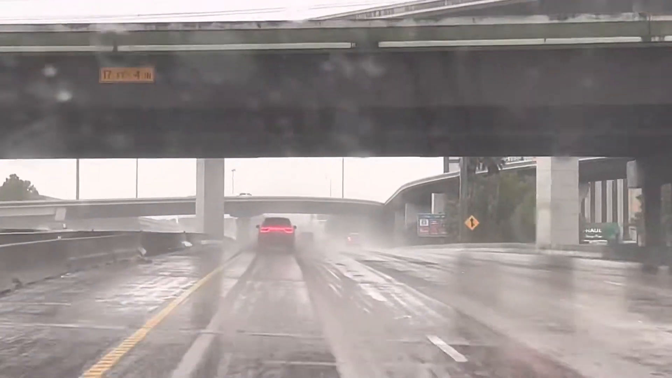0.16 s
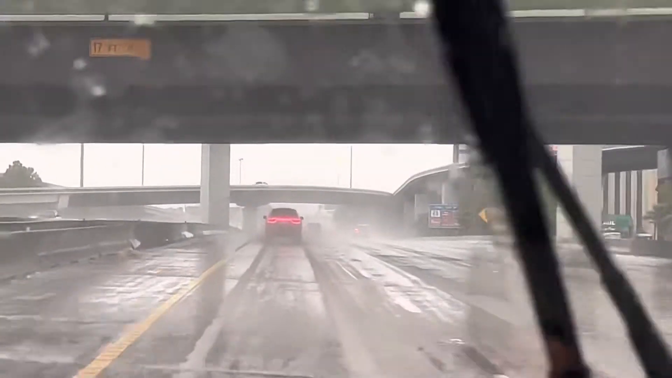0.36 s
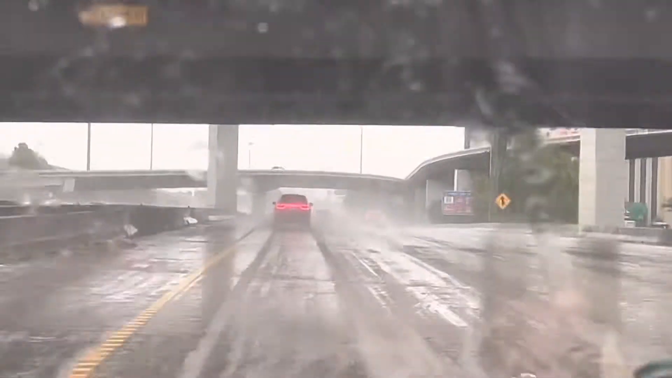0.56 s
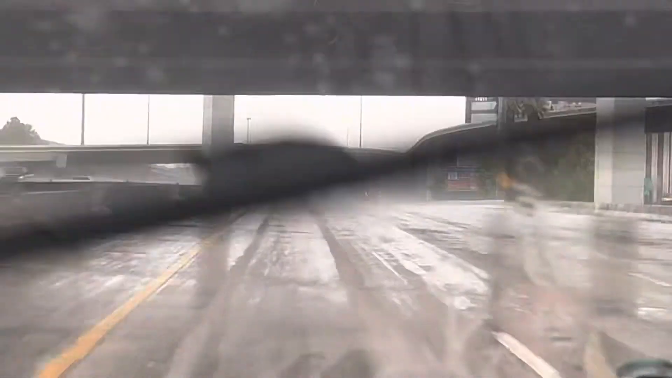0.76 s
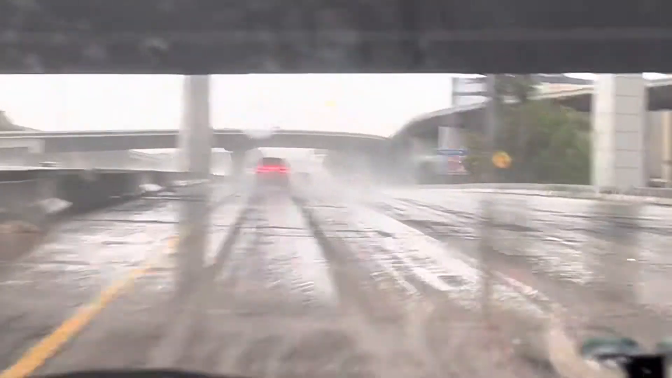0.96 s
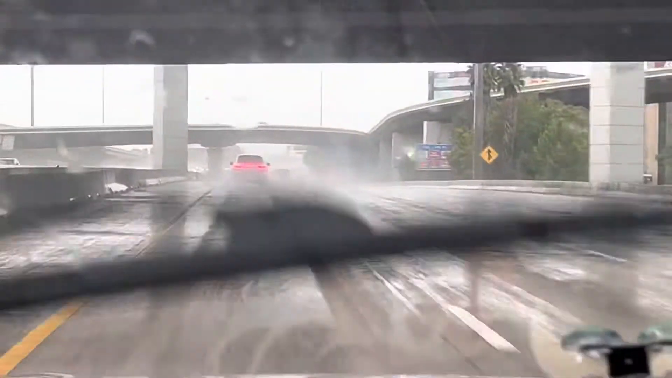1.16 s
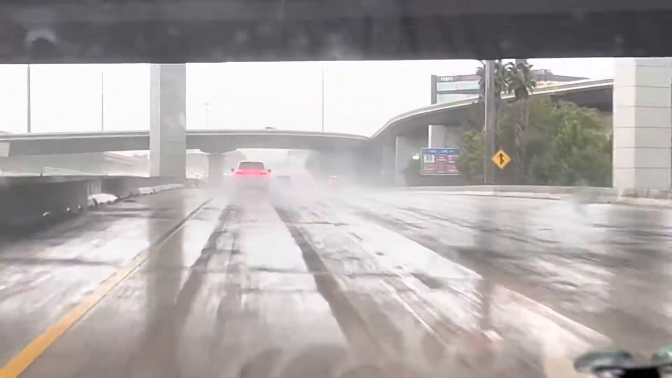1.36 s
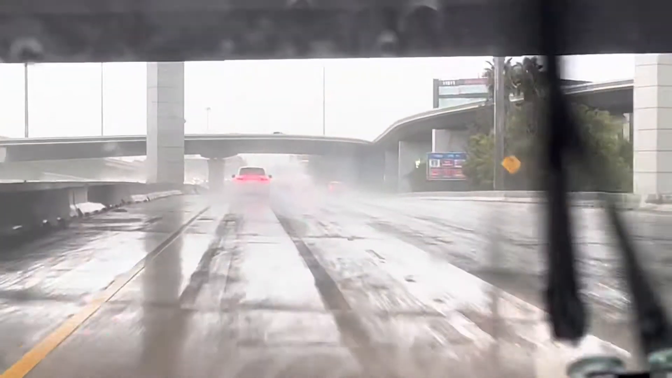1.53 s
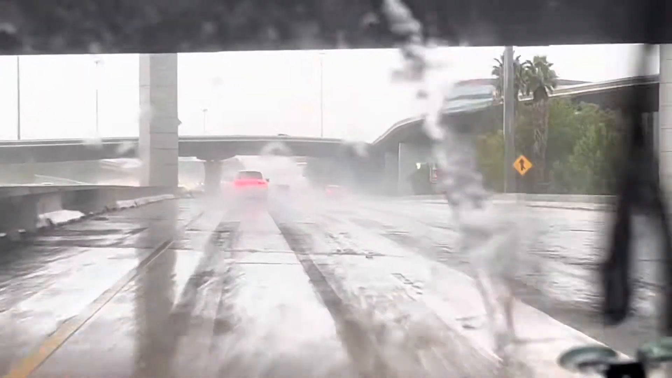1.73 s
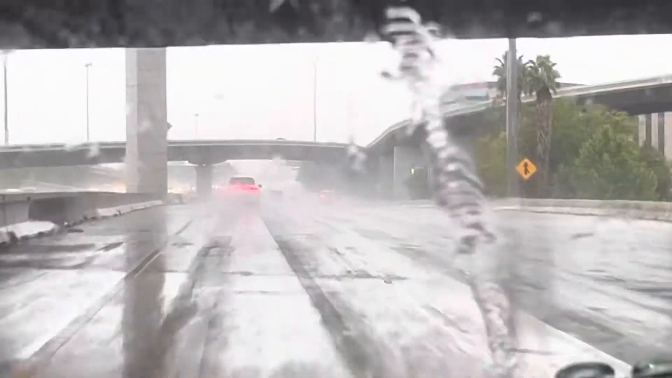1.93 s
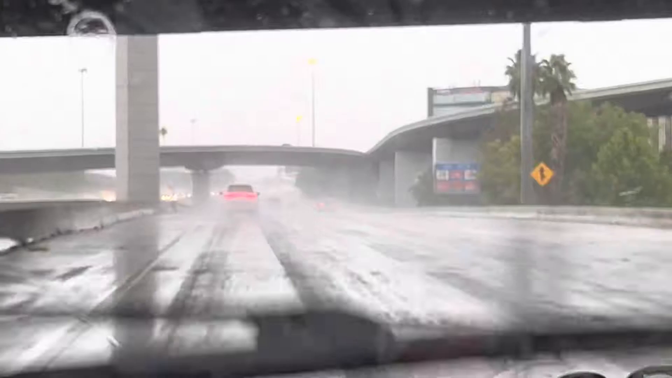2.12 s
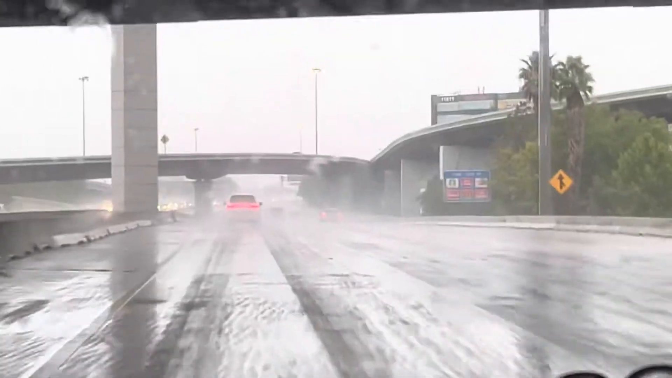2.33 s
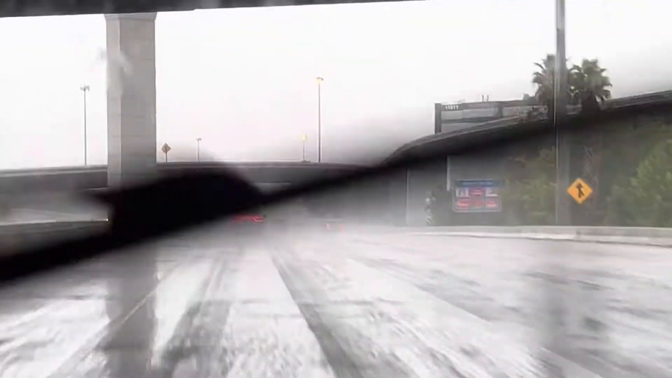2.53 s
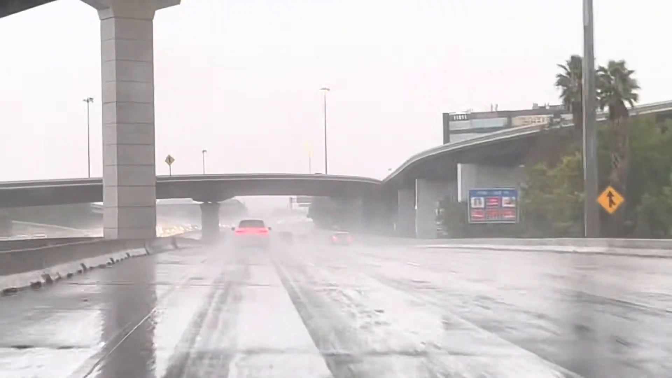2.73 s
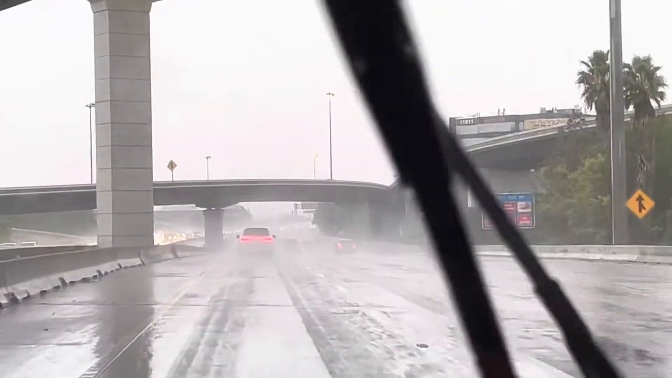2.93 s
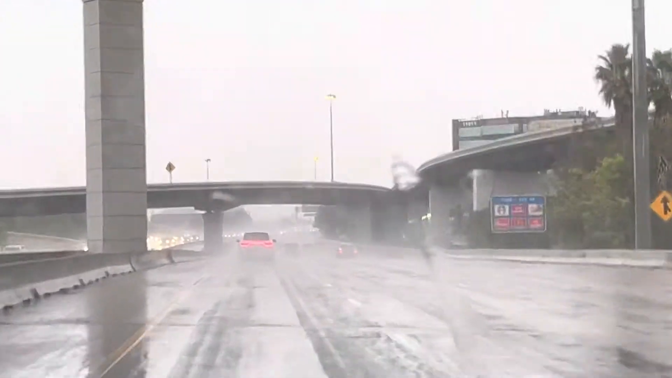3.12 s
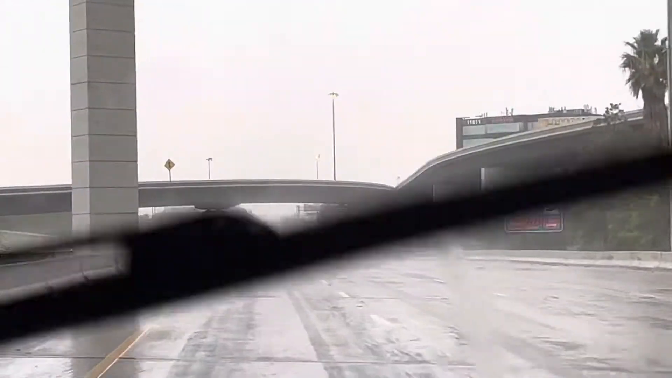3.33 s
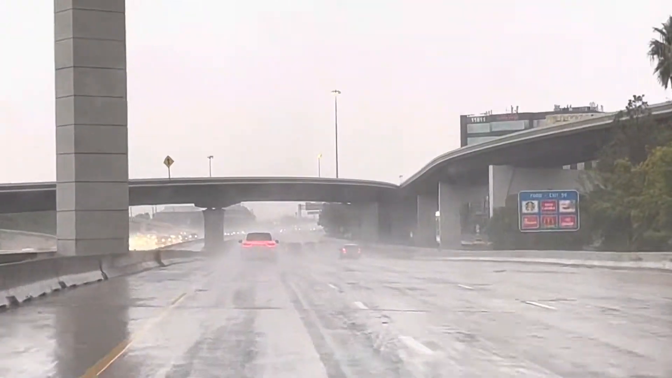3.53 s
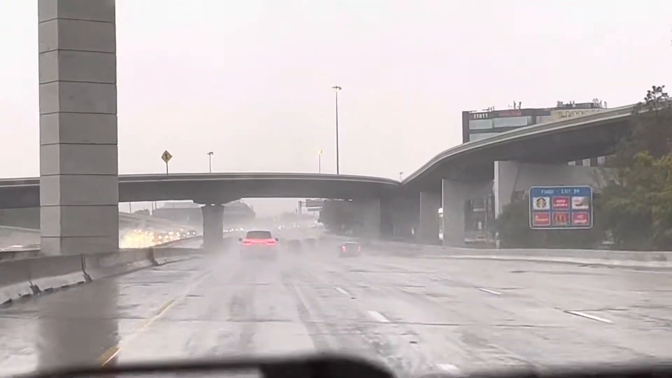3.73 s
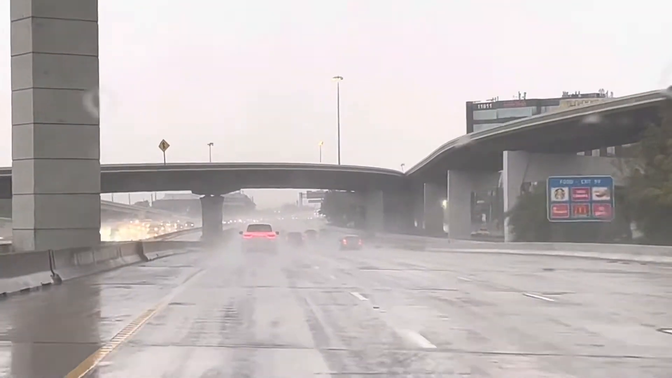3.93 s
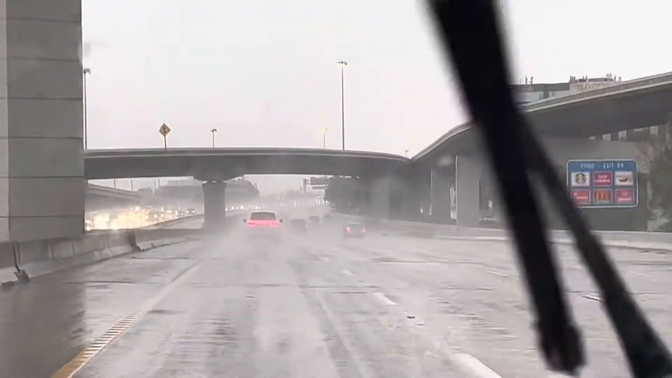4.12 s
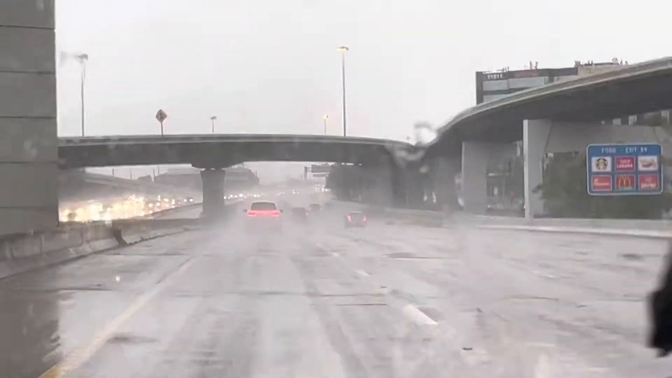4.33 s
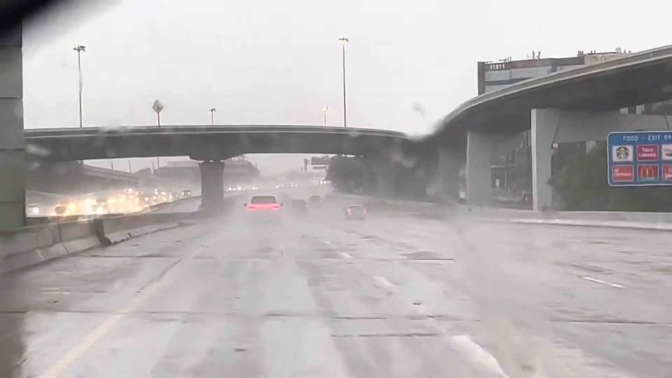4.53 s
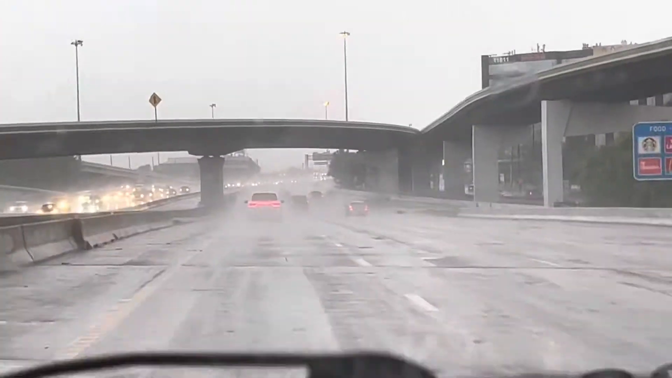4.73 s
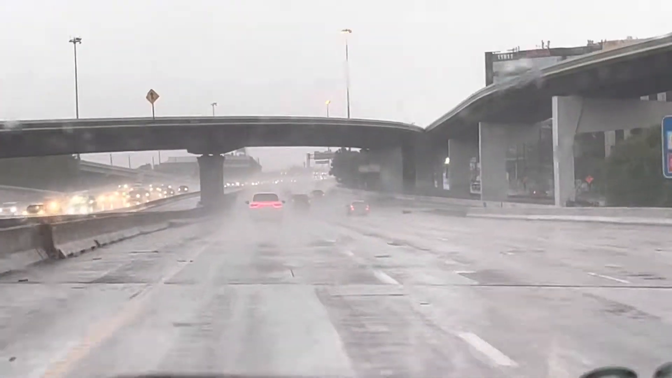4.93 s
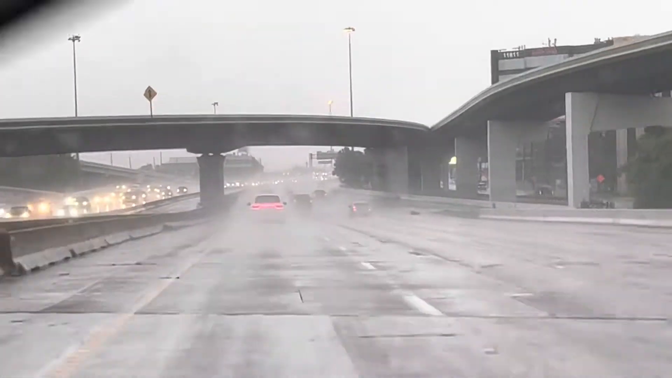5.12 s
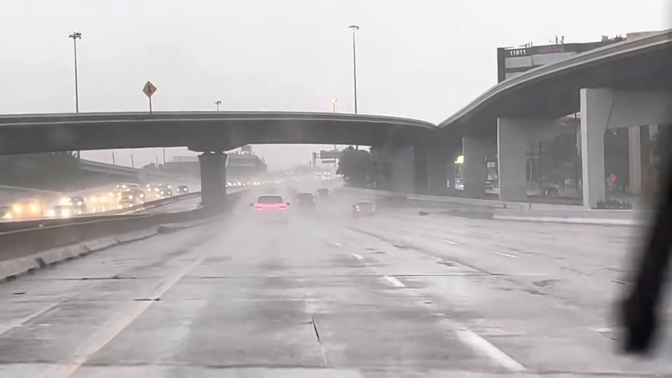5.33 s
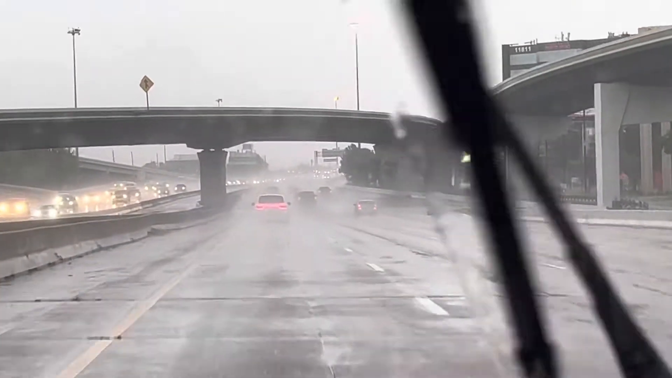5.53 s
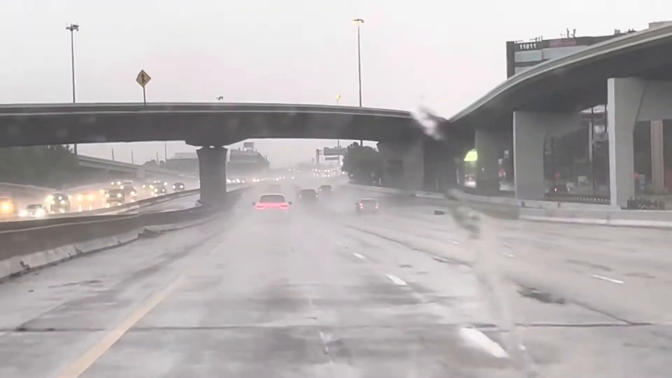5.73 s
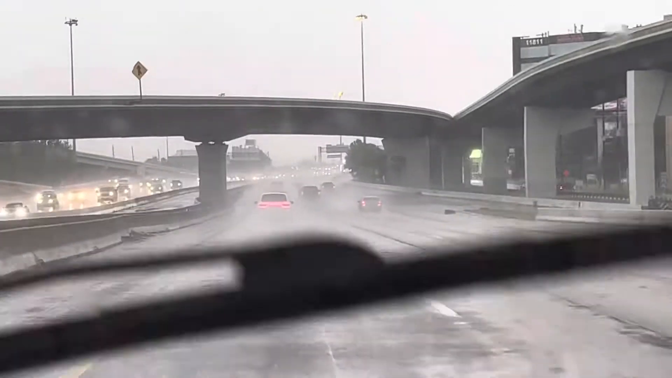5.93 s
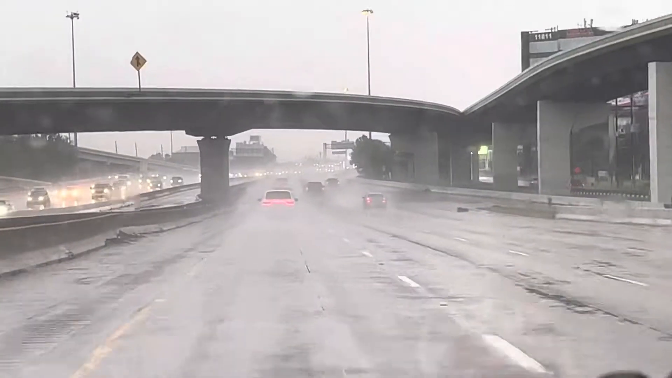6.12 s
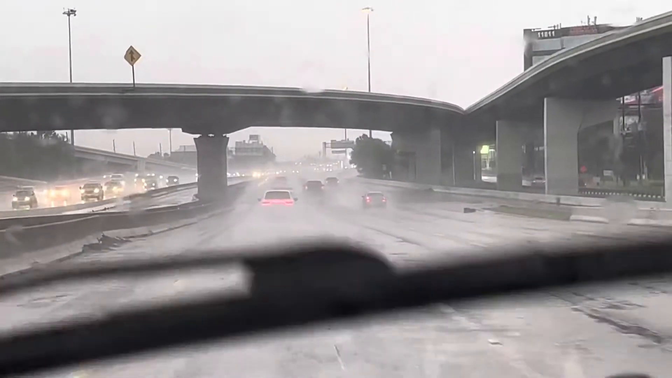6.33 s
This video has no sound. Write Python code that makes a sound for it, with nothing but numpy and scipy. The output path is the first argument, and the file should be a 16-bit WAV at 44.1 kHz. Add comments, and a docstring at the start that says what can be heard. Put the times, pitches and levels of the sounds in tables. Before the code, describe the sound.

A phone-like stereo pickup in a moving car catches crisp, uneven rain spatter on glass above a heavy, boxy road rumble. The rain drops away just after two seconds, flashes back at three, drops again, returns strongly, and drops once more near five. A low unsteady hum from grooved pavement and double thumps of slab joints continue beneath, with soft tyre spray and a small wiper tick in two of the lulls.

```python
"""Tyres roar on a wet concrete freeway, heard inside a car in heavy rain: filtered noise shakes the cabin's resonances.
Slab joints thump as short damped rings; a grooved stretch hums and whines; water hisses in the wheel arches.
Drops patter on the windshield as bursts of noise that ring the glass, and nearly vanish under three overpasses.
The wiper blade ticks twice. A phone with two microphone ports hears it all from behind the glass."""
import sys
import numpy as np
from scipy import signal
from scipy.fft import rfft, irfft
from scipy.io import wavfile
from scipy.ndimage import uniform_filter1d

SR = 44100
rng = np.random.default_rng(int(sys.argv[2]) if len(sys.argv) > 2 else 0)


def dump(signal):
    """Clip the signal to [-1, 1] and save it as 16-bit WAV at the path in sys.argv[1]."""
    limited = np.clip(np.atleast_2d(signal).T, -1, 1)
    pcm = np.round(limited * 32767).astype(np.int16)
    wavfile.write(sys.argv[1], SR, pcm)


N = 284886  # length in samples

# tyre roar over the road surface [t/s, level/dB before each sound's own offset]
ROAD_SURFACE = [(0, -29), (.7, -30.5), (1.3, -29), (1.9, -30), (2.8, -28.5), (5.6, -29), (5.96, -29),
                (6.46, -28.5)]
# uneven slabs that heave the body, smooth ones that let it settle [t/s, length/s, change/dB]
BODY_HEAVES = [(.02, 0.076, 7), (.15, .07, 7), (.445, 0.016, 5), (.57, 0.035, -8), (.65, 0.031, -21),
               (.83, 0.033, -8), (1.01, 0.03, -4), (1.19, 0.13, -4), (1.52, 0.14, 1), (1.82, 0.087, -13),
               (2.04, 0.041, 8), (2.16, 0.054, -10), (2.24, 0.026, 7), (2.32, 0.056, -7), (2.5, 0.069, -15),
               (2.62, 0.038, 4.5), (2.79, .03, 0), (2.86, 0.048, 9), (2.95, .035, 1), (3.06, 0.048, 3.5),
               (3.18, .04, 3), (3.29, .05, 8.5), (3.38, 0.1, -8), (3.55, 0.22, 3), (3.74, 0.061, 0),
               (3.95, .22, 6), (4.18, 0.044, -4), (4.43, 0.071, -3), (4.56, 0.11, 4.5), (4.75, 0.066, 8.5),
               (4.95, 0.044, -2), (5.38, 0.13, 8), (5.6, .06, 4), (5.73, .045, 5.5), (5.86, 0.05, -12),
               (6.12, .1, 3.5), (6.23, 0.07, -5.5), (6.33, 0.046, 1)]
# grooved concrete [t/s, hum pitch f/Hz, hum level/dB, whine level/dB]
GROOVED_ROAD = [(0, 100.2, -28, -71), (2.0, 97.6, -54, -57), (2.25, 100, -27, -54),
                (2.9, 100.8, -23.5, -62), (3.4, 97.85, -25, -50), (3.9, 96.65, -23, -52),
                (4.6, 96.58, -22.5, -52.5), (5.3, 96.48, -23, -56), (5.8, 96.5, -23.5, -57),
                (6.05, 98.2, -29.5, -48.5), (6.46, 99.4, -38, -50.5)]
# how the glass colours a drop [f/Hz, gain/dB]
GLASS_RING = [(500, -19.5), (1200, -1), (1900, 2), (2600, 3), (3300, 5), (4500, 2.5), (6500, 3), (8200, 1),
              (9900, -8), (11700, -2), (13500, -6.5), (15700, -7)]
# part of the overpass loss (in dB) that comes from fewer drops; the rest comes from weaker ones
THINNING_SHARE = 0.23


def undb(db):
    """Turn decibels into a plain gain."""
    return 10 ** (np.asarray(db) / 20)


def unit(x):
    """Scale to an rms (average strength) of 1."""
    return x / np.sqrt(np.mean(x ** 2))


def curve(table, axis=1):
    """One column of a timed table, joined by straight lines, for every sample."""
    rows = np.array(table)
    return np.interp(np.arange(N) / SR, rows[:, 0], rows[:, axis])


def walk(rate):
    """Slow random wander of rms 1: levels held for 1 / rate seconds, then smoothed twice."""
    hold = int(SR / rate)
    steps = np.repeat(rng.standard_normal(N // hold + 1), hold)
    smooth = uniform_filter1d(uniform_filter1d(steps, hold), hold)
    return unit(smooth[:N])


def swells(table):
    """Sum of bell-shaped changes in dB from rows [t/s, length/s at half height, change/dB]."""
    t = np.arange(N) / SR
    return sum(db * .5 ** ((2 * (t - s) / length_s) ** 2) for s, length_s, db in table)


def colour(x, points, size=16384):
    """Filter through [f/Hz, gain/dB] points that only looks back in time, built from the cepstrum."""
    hz, db = np.transpose(points)
    f = np.maximum(np.fft.rfftfreq(size, 1 / SR), 1)
    cepstrum = irfft(np.log(undb(np.interp(np.log(f), np.log(hz), db))))
    # folding the cepstrum forward puts the response as early as it can be
    cepstrum[1:size // 2] *= 2
    cepstrum[size // 2 + 1:] = 0
    response = irfft(np.exp(rfft(cepstrum)))
    return signal.fftconvolve(x, response)[:len(x)]


def ring(x, modes):
    """Sum of resonances [f/Hz, width/Hz, gain/dB] driven by x."""
    return sum(undb(db) * signal.lfilter(*signal.iirpeak(hz, hz / width, fs=SR), x) for hz, width, db in modes)


def blow(hz, swell_s, order=1):
    """A heavily damped ring whose outline peaks after swell_s; a higher order is more compact."""
    t = np.arange(SR // 4) / SR
    outline = (t / swell_s * np.exp(1 - t / swell_s)) ** order
    return outline * np.sin(2 * np.pi * (hz * t + rng.random()))


def add(track, s, sound):
    """Mix a short sound in at time s."""
    i = max(int(s * SR), 0)
    track[..., i:i + sound.shape[-1]] += sound[..., :N - i]


def cabin(source):
    """Two unrelated paths of a source make a diffuse field: alike at both ports in the bass, apart near 1 kHz."""
    # difference between the ports [f/Hz, side minus mid level/dB]
    port_difference = [(30, -30), (60, -19.5), (130, -12.5), (220, -11), (380, -8.5), (600, -2.5),
                       (780, -3.5), (950, 1), (1250, -4.5), (1550, -8.5), (2400, -42), (3400, -19.5),
                       (6000, -43.5), (9000, 0.5), (15000, 2)]
    mid = unit(source())
    side = colour(unit(source()), port_difference)
    return np.array([mid + side, mid - side])


def roar(db=5, heave_share=0.083):
    """Tread blocks pound rough concrete, a little harder where the body heaves."""
    # tyre roar as the cabin lets it in [f/Hz, gain/dB]
    roar_tone = [(20, -30), (34, -12), (45, -6.5), (80, -1.5), (130, .5), (148, -8.5), (215, -8.5),
                 (340, -16.5), (450, -21), (720, -22.5), (880, -29), (1150, -31), (1450, -40.5),
                 (2400, -79)]
    # the 0.57 dB waver is separate on each path
    tread = cabin(lambda: colour(rng.standard_normal(N), roar_tone) * undb(0.57 * walk(18)))
    return tread * undb(curve(ROAD_SURFACE) + db + heave_share * swells(BODY_HEAVES))


def tread_ring(hz=768, width_hz=40, db=-21, waver_db=2):
    """Air in the tread channels rings like a short pipe: noise through two resonances at one pitch."""
    def pipe():
        narrow = ring(rng.standard_normal(N), [(hz, width_hz, 0)])
        return ring(narrow, [(hz, 2 * width_hz, 0)])
    return cabin(pipe) * undb(curve(ROAD_SURFACE) + db + waver_db * walk(12))


def boom(evenness=0.8, shake_db=-19, waver_db=1.5):
    """The shaking body pumps the lowest air resonances of the cabin."""
    # cabin air and panel resonances [f/Hz, width/Hz, gain/dB]
    cabin_modes = [(43.16, 4.9, -7), (57.25, 10.7, -3)]
    bass_tone = [(20, -31.0), (34, -17.0), (42, -0.5), (64, -4.5), (85, -13.0), (200, -45.0)]

    def air():
        wave = colour(ring(rng.standard_normal(N), cabin_modes), bass_tone)
        outline = np.abs(signal.hilbert(unit(wave)))
        return wave / (outline + 0.23) ** evenness  # evens out the random swings
    return cabin(air) * undb(shake_db + swells(BODY_HEAVES) + waver_db * walk(18))


def grooves(waver_db=2.5):
    """Evenly spaced grooves drum the tyres into an unsteady hum of a few wandering partials."""
    # partials of the hum [multiple of its pitch, level/dB, pitch wander as a share]
    hum_partials = [(1, 0, .016), (2, -12, .018), (3, -17, .008), (4, -23, .008)]
    pitch = curve(GROOVED_ROAD)

    def song():
        out = 0
        for multiple, db, wander in hum_partials:
            partial_hz = multiple * pitch * (1 + wander * walk(40))
            phase = 2 * np.pi * np.cumsum(partial_hz) / SR
            out = out + undb(db + waver_db * walk(22)) * np.sin(phase)
        return out
    return cabin(song) * undb(curve(GROOVED_ROAD, axis=2))


def spray():
    """Smooth hiss of water thrown up by the tyres: coloured noise with a slight waver."""
    # water thrown into the wheel arches [t/s, level/dB]
    arch_water = [(0, -49), (2.3, -49), (2.8, -48), (3.6, -50), (4.5, -50), (5.2, -52), (5.65, -54),
                  (6.46, -47.5)]
    # spray as the cabin lets it in [f/Hz, gain/dB]
    water_tone = [(600, -13.5), (1400, 5), (2000, 1.5), (2700, 0.5), (3500, 1), (4500, -6), (6000, -10.5),
                  (9000, -28), (16000, -60.5)]
    return cabin(lambda: colour(rng.standard_normal(N), water_tone)) * undb(curve(arch_water) + .5 * walk(13.0))


def shelter():
    """Loss of rain in dB under overpasses: the patter dies away on entering and returns quickly on leaving."""
    # overpasses [enter t/s, leave t/s, time to die away/s, loss/dB]
    bridges = [(2.146, 2.96, 0.16, -29.5), (3.065, 3.725, 0.125, -28.5), (5.068, 5.674, 0.045, -24)]
    return_s = 0.02
    t = np.arange(N) / SR
    loss = 0
    for under, out, die_s, db in bridges:
        entering = np.clip((t - under) / die_s, 0, 1)
        leaving = np.clip((t - out) / return_s, 0, 1)
        loss = loss + db * (entering - leaving)
    return loss


def splat(splash_s, splash_db, snap_db=2, crack_s=0.00027, echo_s=0.011, echo_db=-23, size=2048):
    """One drop at both ports: a snap and crack, the splash spreading, a faint tail off dashboard and windows."""
    t = np.arange(size) / SR
    fade = np.exp(-t / crack_s) + undb(splash_db) * np.exp(-t / splash_s) + undb(echo_db) * np.exp(-t / echo_s)
    mid, side = fade * rng.standard_normal((2, size))
    mid[:2] = undb(snap_db) * np.array([1, -1])  # the snap is nearly all treble
    # the ports differ most below about 1 kHz
    side_tone = [(1000, 0.5), (2200, -42), (3400, -13.5), (6500, -30), (8500, -14.5), (15000, -24)]
    side = colour(side, side_tone, size=256)
    return np.array([mid + side, mid - side]) / np.sqrt(np.sum(mid ** 2))


def patter(per_s, spread_db, largest, splash_s, splash_db, tone, count=32):
    """Drops of very uneven size, fewer under an overpass; each patch of glass answers with its own splat."""
    out = np.zeros((2, N))
    arriving = undb(THINNING_SHARE * shelter()) ** 2  # chance that a drop gets through
    for patch in range(count):
        drops = int(per_s * N / SR / count)
        when, rank, luck = rng.random((2048, 3))[:drops].T
        at = (when * N).astype(int)
        size_db = spread_db * np.minimum(-np.log(1 - rank), largest)
        hits = np.zeros(N)
        hits[at] = (luck < arriving[at]) * undb(size_db)
        # patches run from dull to bright
        tilt_db = 3.6 * (2 * patch / (count - 1) - 1)
        tilt = [(1500, -tilt_db), (12000, tilt_db)]
        drop = np.array([colour(port, tilt, size=256) for port in splat(splash_s, splash_db)])
        out += signal.oaconvolve(hits[None], drop, axes=1)[:, :N]
    return unit(np.array([colour(colour(port, GLASS_RING), tone) for port in out]))


def rain(rain_db=-42.3, ticks_db=-9):
    """A dense spatter that rings the glass, and sparse sharp ticks from drops that burst on it."""
    # denser and thinner sheets of rain hitting the glass [t/s, length/s, change/dB]
    rain_sheets = [(.07, 0.31, 1), (.44, 0.068, 1), (.58, .04, -0.5), (.9, 0.035, 4.5), (.97, 0.064, -0.5),
                   (1.15, 0.1, 3.5), (1.34, 0.08, 2), (1.69, 0.17, 3), (3.03, 0.098, -1), (3.77, 0.046, 2),
                   (4.185, 0.034, 5), (4.38, 0.064, 1), (4.52, 0.057, 2), (5, 0.097, -4.5),
                   (5.92, 0.055, 3), (6.15, 0.049, 4), (6.25, 0.03, 7)]
    spatter = patter(per_s=2400, spread_db=4.3, largest=4.8, splash_s=0.0042, splash_db=-4.5,
                     tone=[(6000, 1), (12000, -3)])
    ticks = patter(per_s=200, spread_db=5.8, largest=3.5, splash_s=.002, splash_db=-13,
                   tone=[(2500, -10), (6000, 0), (12000, 6)])
    # the airflow throws the drops in quick clusters and slower sheets
    flurries = undb(1.1 * walk(70) + .6 * walk(25))
    level = undb(rain_db + swells(rain_sheets) + (1 - THINNING_SHARE) * shelter())
    return (spatter + undb(ticks_db) * ticks) * flurries * level


def joints(thump_s=0.0048, knock_s=0.0075, panel_s=0.04, panel_db=-10, rattle_s=0.012, rattle_db=-5,
           knock_part_db=-4, rattle_width_hz=130):
    """Each joint gives the tyre a round thump and a hollow knock; floor pan shudders, panels and arch rattle on."""
    # tyres crossing slab joints
    # [t/s, thump level/dB, thump f/Hz, knock level/dB, knock f/Hz, shudder level/dB]
    crossings = [(0.06, -24, 151, -38, 603, -12.5), (0.135, -20, 160, -42, 624, -34),
                 (0.206, -26, 190, -32, 770, -29), (0.389, -22, 134, -35, 470, -34),
                 (0.696, -19.5, 137, -36, 506, -20.5), (0.811, -14.5, 210, -30, 493, -25),
                 (0.845, -13, 137, -40, 535, -26), (1.433, -17, 192, -26.5, 595, -40),
                 (1.475, -20, 201, -35, 570, -37), (2.072, -18, 184, -28, 574, -16),
                 (2.183, -23, 168, -28, 746, -36), (2.683, -16, 165, -26.5, 740, -17.5),
                 (2.91, -15, 140, -31, 760, -26), (3.526, -15.5, 158.7, -35, 770, -23),
                 (3.951, -16.5, 210, -31, 551, -14.5), (4.559, -22, 135, -28, 558, -34),
                 (4.803, -14, 202, -27.5, 541, -30), (5.177, -14.5, 194, -34, 657, -27),
                 (5.766, -14.5, 150, -24.5, 628, -17), (6.048, -16, 160, -20.5, 415, -15.5),
                 (6.254, -15, 185, -20, 732, -31), (6.352, -39, 171.7, -29, 767, -38),
                 (6.381, -15.5, 133, -24.5, 646, -15.5)]
    # panel resonances [f/Hz, width/Hz, gain/dB]
    panel_modes = [(117.5, 14, -4), (184, 6.9, 4), (217, 24, 0.5)]
    # ring of a tyre's knock [ratio to its pitch, relative level/dB]
    knock_modes = [(.47, -2), (.62, -12.5), (0.841, -4.5), (1.001, -2.5), (1.7, -19.5)]
    # what the floor pan, then the wheel arch, pass of a jolt [f/Hz, gain/dB]
    floor_tone = [(60, -17), (120, 5), (300, -3.5), (1200, -20)]
    arch_tone = [(150, -9.5), (300, 1.5), (780, 6), (1300, -21.5)]
    shudder_hz, shudder_swell_s = 113.7, 0.032  # floor pan's main resonance, varied a little at each joint

    out, t = np.zeros((2, N)), np.arange(SR // 4) / SR
    swell = 1 - np.exp(-t / thump_s)
    for s, thump_db, thump_hz, knock_db, knock_hz, shudder_db in crossings:
        panels = cabin(lambda: colour(ring(rng.standard_normal(len(t)), panel_modes), floor_tone, size=4096))
        thump = blow(thump_hz, thump_s) + undb(panel_db) * swell * np.exp(-t / panel_s) * panels
        shudder = blow(shudder_hz * (1 + .03 * rng.standard_normal()), shudder_swell_s, order=2)
        modes = [(ratio * knock_hz, rattle_width_hz, db) for ratio, db in knock_modes]
        rattle = cabin(lambda: colour(ring(rng.standard_normal(len(t)), modes), arch_tone, size=4096))
        knock = sum(undb(db + knock_part_db) * blow(hz, knock_s) for hz, width, db in modes)
        knock = knock + undb(rattle_db) * swell * np.exp(-t / rattle_s) * rattle
        add(out, s, undb(thump_db) * thump + undb(shudder_db) * shudder + undb(knock_db) * knock)
    return out


def fat_drops(db=7.0, body_db=15, top_db=17.5, delay_s=0.001):
    """Single big drops that stand out of the patter, some dull and some sharp."""
    # fat drops on the windshield, each level before its offset
    # [t/s, overall level/dB, body (low) level/dB, sharpness (high) level/dB]
    big_drops = [(0.104, -26, -21, -16), (0.1228, -17, -18, -13), (0.2937, -15, -19, -19),
                 (0.3406, -24, -24, -17), (0.403, -18.5, -13, -18), (0.5053, -19, -25, -17),
                 (0.5658, -13, -24, -13), (0.577, -16, -15, -16), (0.583, -16, -16, -11),
                 (0.664, -15, -27, -15), (0.7277, -17.5, -16, -18), (0.7963, -18, -22, -22),
                 (0.846, -19.5, -12, -23), (0.866, -17, -6, -19), (0.8872, -20, -13, -12),
                 (0.904, -18, -9, -20), (0.917, -22, -16, -27), (1.0241, -19.5, -20, -6),
                 (1.1057, -16, -12, -26), (1.1742, -18, -21, -19), (1.3134, -23, -14, -4),
                 (1.363, -15, -28, -11), (1.3822, -13, -20, -20), (1.486, -14.5, -20, -19),
                 (1.5968, -16, -17, -15), (1.6817, -10, -18, -16), (1.702, -24, -15, -21),
                 (1.744, -15, -17, -18), (1.813, -15, -19, -14), (1.9069, -14, -23, -20),
                 (1.972, -16.5, -19, -41), (2.0215, -17, -25, -26), (2.1473, -22, -27, -5),
                 (2.157, -15.5, -27, -12), (2.7522, -44, -36, 3), (2.9715, -17, -20, -11),
                 (2.9966, -19, -30, -14), (3.0141, -20, -18, -29), (3.1757, -47, -36, 0),
                 (3.7376, -15.5, -14, -23), (3.7604, -19, -10, -10), (3.8081, -19, -22, -6),
                 (3.8594, -16.5, -22, -15), (3.9222, -14.5, -21, -16), (3.99, -10, -17, -14),
                 (3.994, -15.5, -16, -15), (4.0754, -16.5, -13, -18), (4.0966, -12, -17, -22),
                 (4.166, -8, -36, -14), (4.182, -16, -8, -19), (4.191, -20, -9, -22),
                 (4.213, -22, -24, -10), (4.254, -8, -22, -12), (4.2792, -20, -27, -12),
                 (4.3022, -19, -28, -20), (4.4803, -23, -30, -22), (4.502, -17, -30, -18),
                 (4.5236, -15, -23, -22), (4.719, -16.5, -15, -26), (4.904, -11, -19, -27),
                 (4.9282, -17, -23, -27), (5.0588, -24, -5, -26), (5.5202, -42, -36, 2),
                 (5.5756, -46, -36, 0), (5.692, -20, -26, -17), (5.7765, -17, -10, -36),
                 (5.8415, -21, -24, -8), (5.874, -12.5, -14, -6), (5.915, -17.5, -25, -22),
                 (5.9354, -17, -10, -17), (5.9932, -19, -17, -12), (6.026, -10, -21, -20),
                 (6.093, -17, -16, -20), (6.169, -22, -22, -6), (6.215, -12, -15, -11),
                 (6.246, -16.5, -14, -18), (6.422, -15, -15, -20)]
    out = np.zeros((2, N))
    for s, drop_db, low_db, high_db in big_drops:
        tone = [(2200, low_db + body_db), (5000, 0.014), (12000, high_db + top_db)]
        burst = splat(splash_s=.004, splash_db=-7.5, snap_db=8)
        drop = np.array([colour(colour(port, GLASS_RING, size=1024), tone, size=256) for port in burst])
        # the level sets the whole energy of the drop at the left port
        add(out, s + delay_s, drop / np.linalg.norm(drop[0]) * undb(drop_db + db))
    return out


def windshield():
    """All the rain on the glass; its treble reaches the two ports out of step."""
    # how far the left port lags for sound from the glass [f/Hz, phase/rad]
    left_lag = [(0, 0), (2500, 0), (3300, -.3), (4500, -.1), (7400, 0), (7800, .6), (8500, 1), (9300, 2.9),
                (10500, 3.2), (11500, 4.4), (12700, 6), (13700, 6.3), (15700, 8.6)]
    left, right = rain() + fat_drops()
    lag = np.interp(np.fft.rfftfreq(N, 1 / SR), *np.transpose(left_lag))
    return np.array([irfft(rfft(left) * np.exp(-1j * lag), N), right])


def whine(hz=1178, width_hz=24):
    """Fine ridges across the lane make the tread sing a thin, breathy note: noise through two resonances."""
    def song():
        narrow = ring(rng.standard_normal(N), [(hz, width_hz, 0)])
        return ring(narrow, [(hz, 4 * width_hz, 0)])
    return cabin(song) * undb(curve(GROOVED_ROAD, axis=3))


def wiper(rise_s=0.0004, fade_s=0.0037):
    """The blade flips over on the glass: a small, pitched tick of a few fading sines."""
    # blade flips [t/s, pitch f/Hz, level/dB before the ring and fade]
    flips = [(2.464, 1620, -35), (5.555, 1581, -30.5)]
    # ring of the blade [ratio to its pitch, relative level/dB]
    blade_modes = [(.72, -19), (1, 2), (1.14, -11), (1.38, -12)]
    out, t = np.zeros(N), np.arange(SR // 25) / SR
    outline = (1 - np.exp(-t / rise_s)) * np.exp(-t / fade_s)
    for s, hz, db in flips:
        tone = sum(undb(mode_db) * np.sin(2 * np.pi * ratio * hz * t) for ratio, mode_db in blade_modes)
        add(out, s, undb(db) * outline * tone)
    return out


def scene():
    """Road noise through the body, plus spray, rain on the glass and the wiper."""
    road = roar() + tread_ring() + boom() + grooves() + whine() + joints()
    lean_db = .5  # the road noise is a little stronger on the right
    return road * undb([[-lean_db], [lean_db]]) + spray() + windshield() + wiper()


def record(dry):
    """The phone drops the deepest rumble, rounds the largest swings and cuts the top."""
    low_cut_hz, top_hz, drive = 35, 15800, .9
    sound = signal.sosfilt(signal.butter(5, low_cut_hz, "high", fs=SR, output="sos"), dry)
    rounded = np.tanh(drive * sound) / drive
    return signal.sosfilt(signal.ellip(10, .2, 80, top_hz, fs=SR, output="sos"), rounded)


dry = scene()
out = record(dry)
dump(out)
```